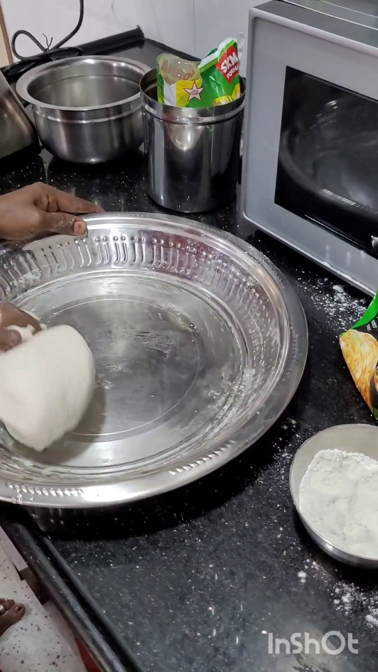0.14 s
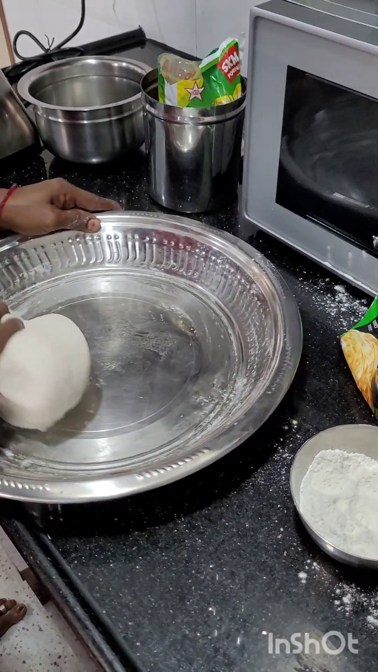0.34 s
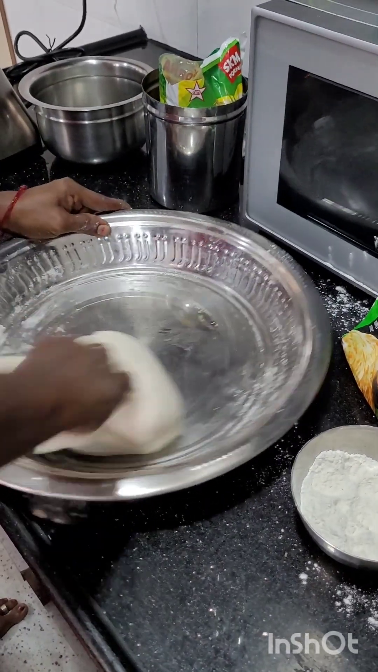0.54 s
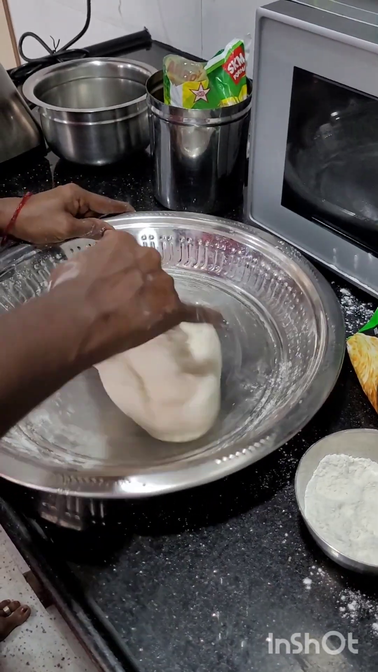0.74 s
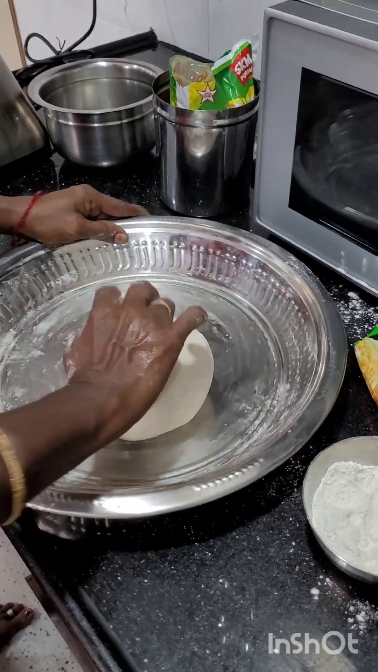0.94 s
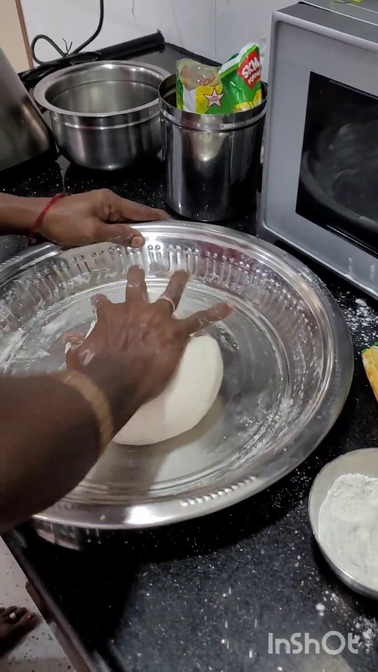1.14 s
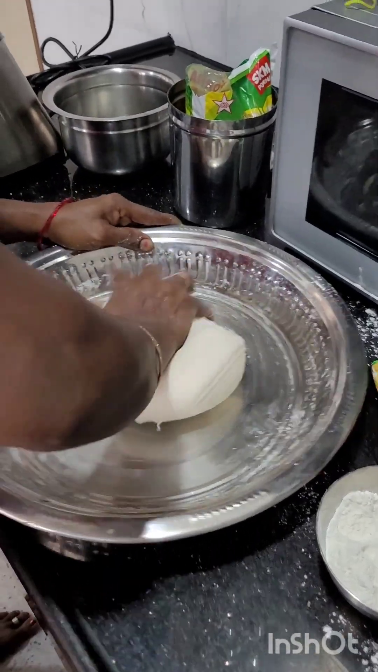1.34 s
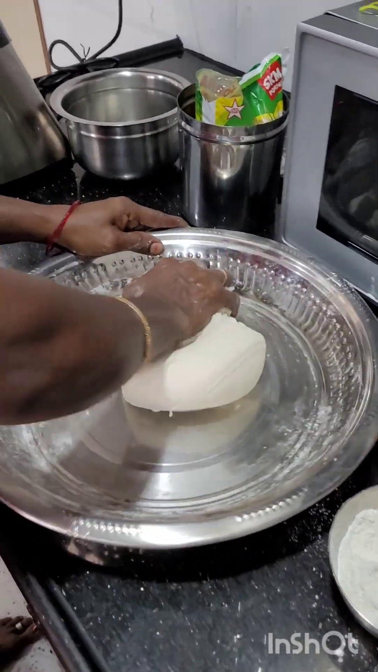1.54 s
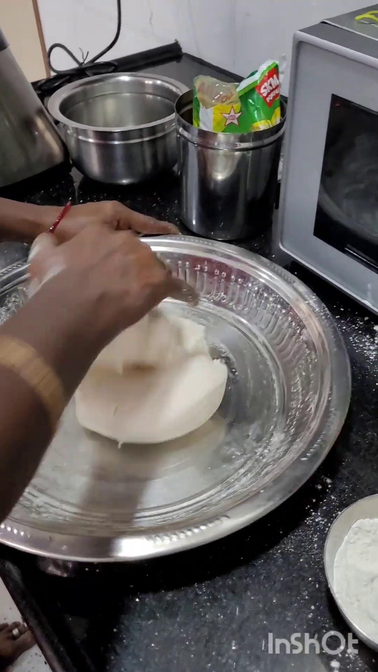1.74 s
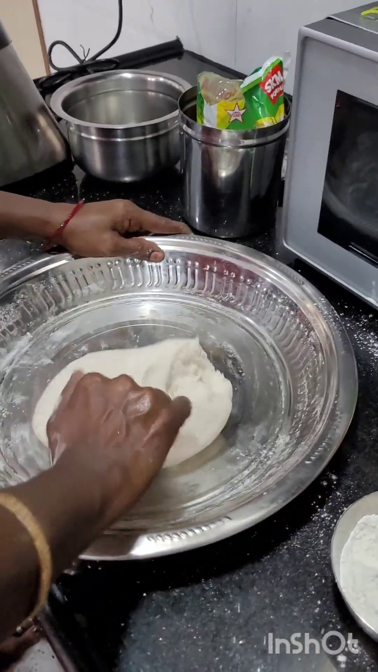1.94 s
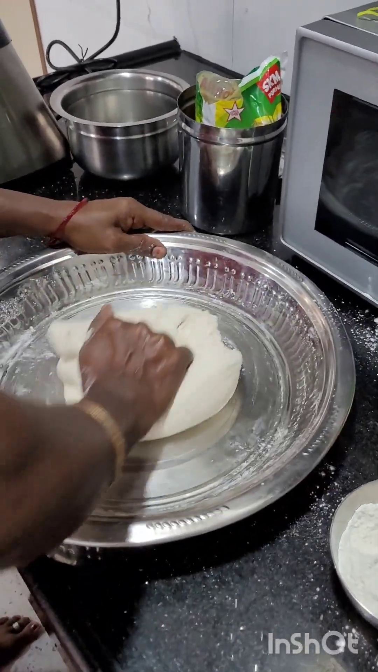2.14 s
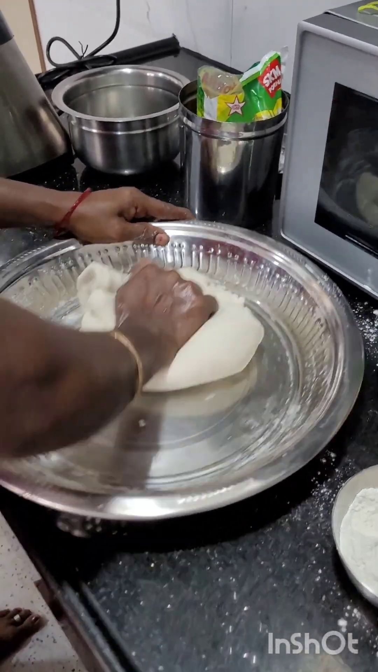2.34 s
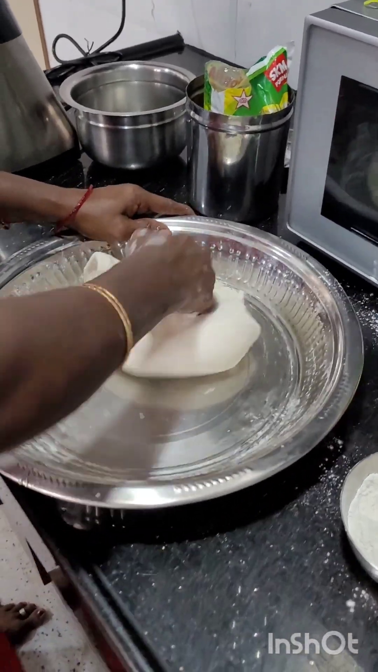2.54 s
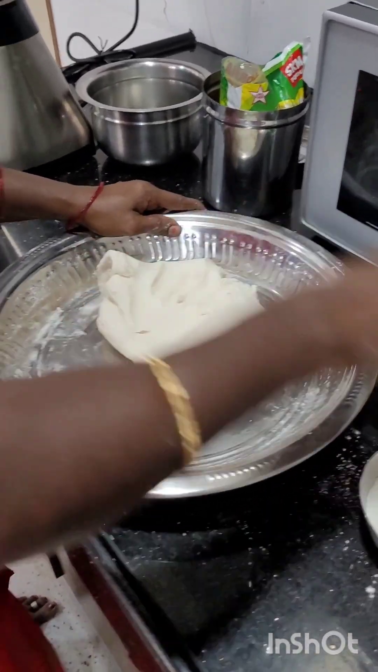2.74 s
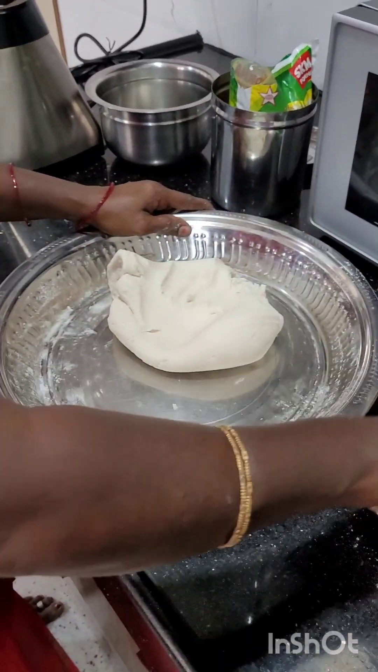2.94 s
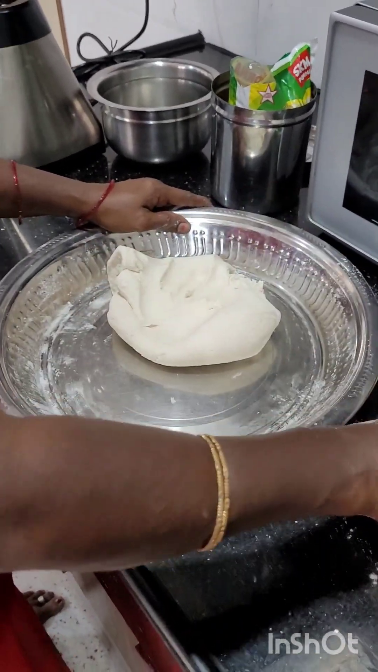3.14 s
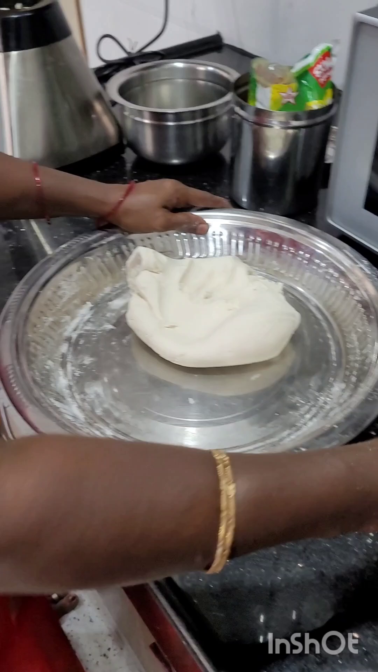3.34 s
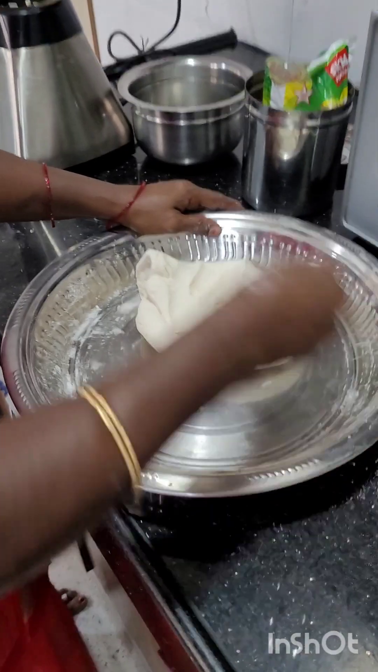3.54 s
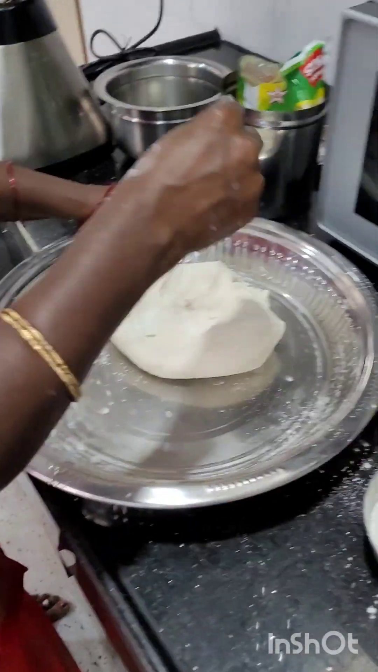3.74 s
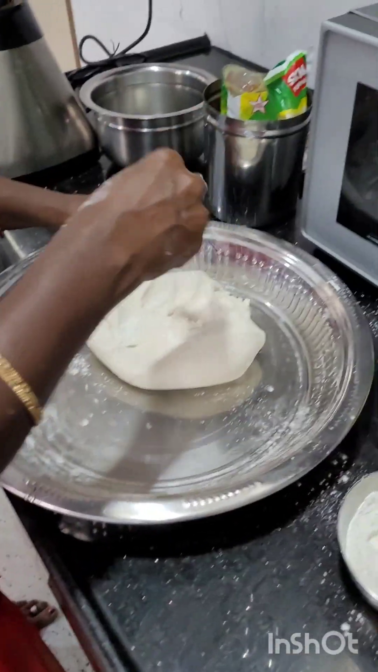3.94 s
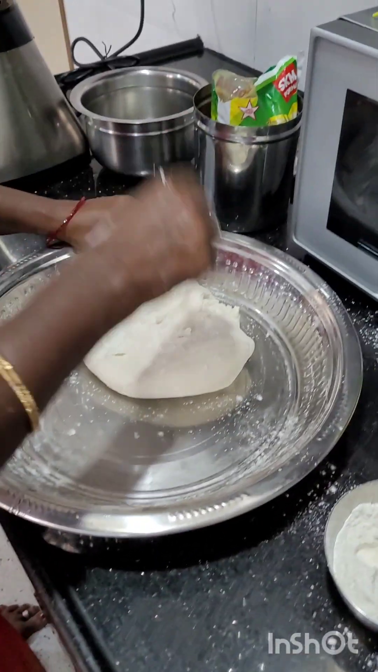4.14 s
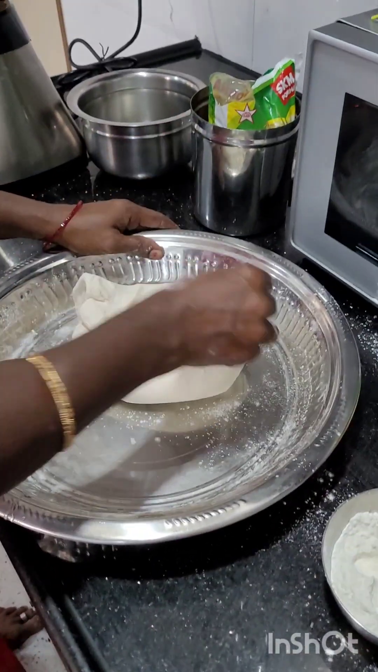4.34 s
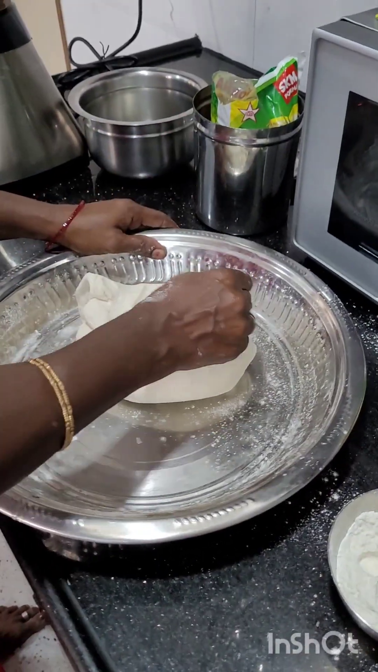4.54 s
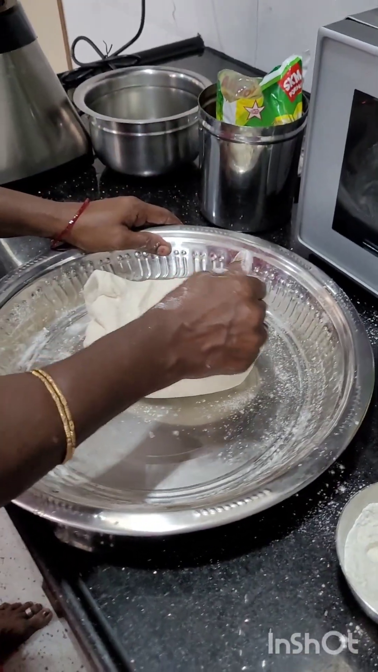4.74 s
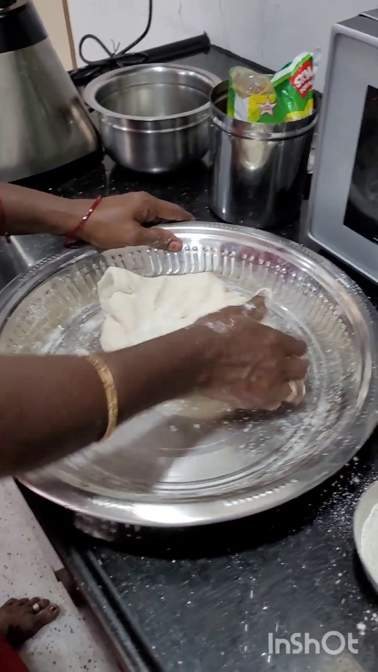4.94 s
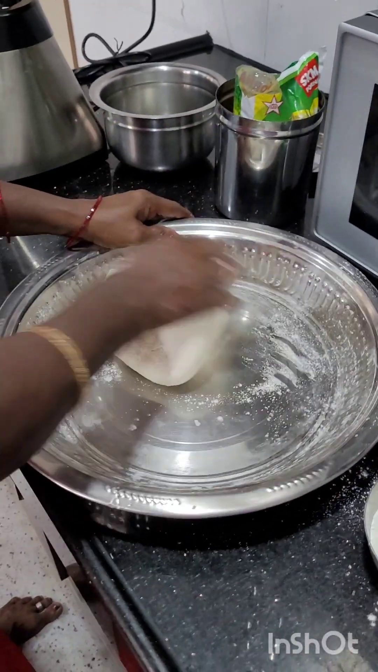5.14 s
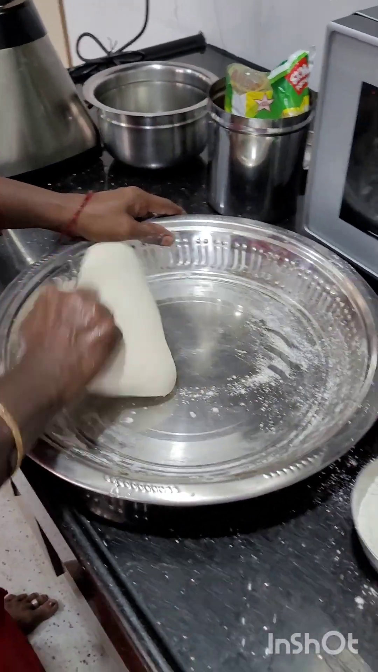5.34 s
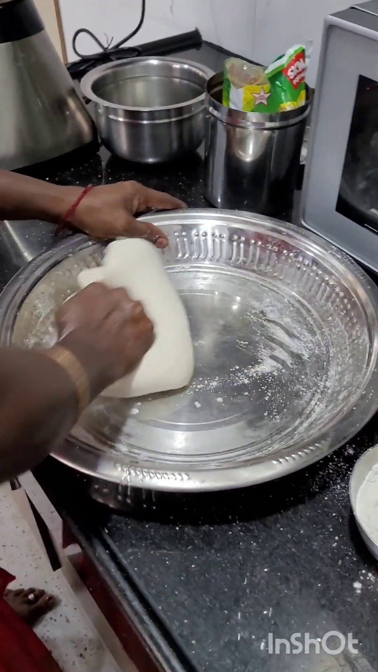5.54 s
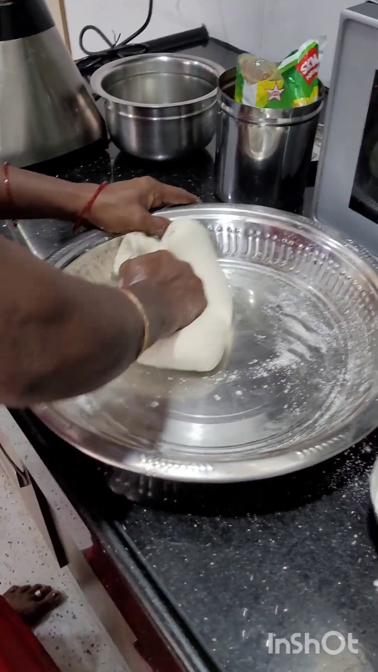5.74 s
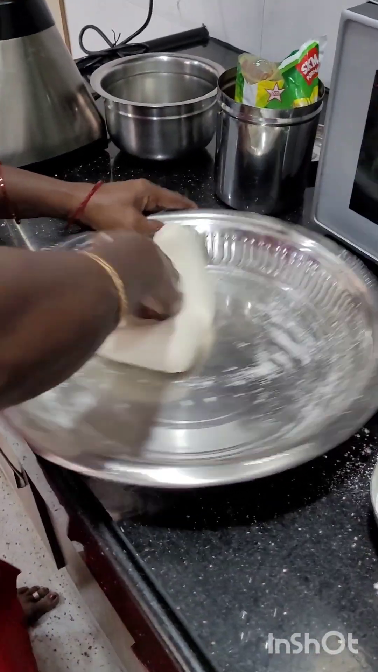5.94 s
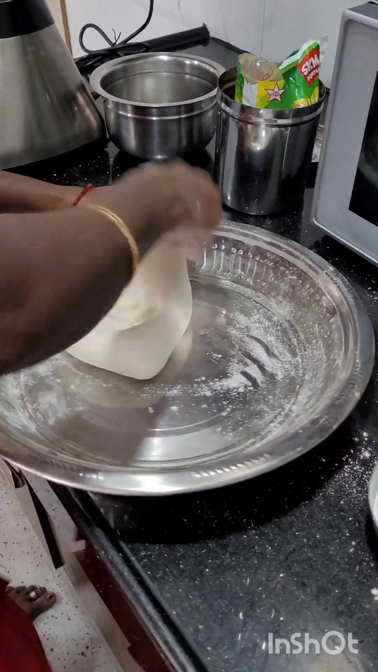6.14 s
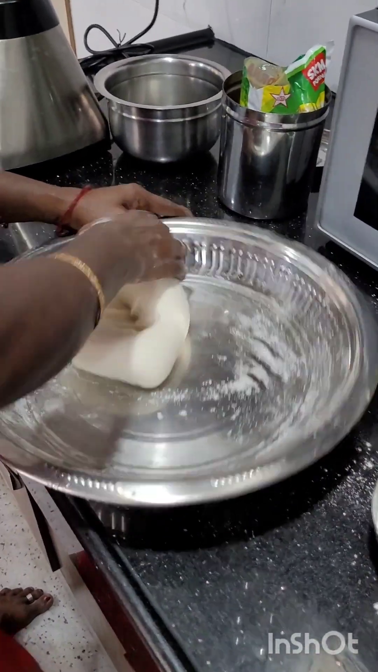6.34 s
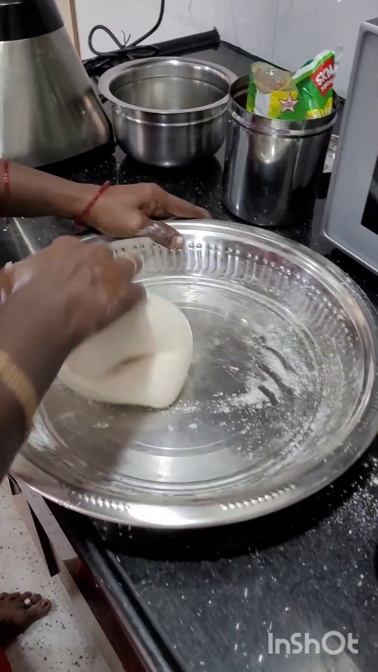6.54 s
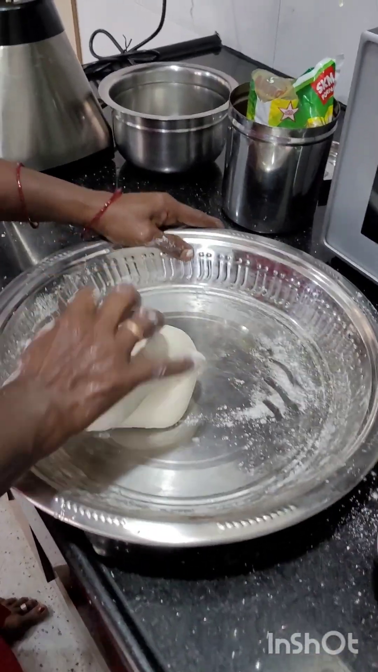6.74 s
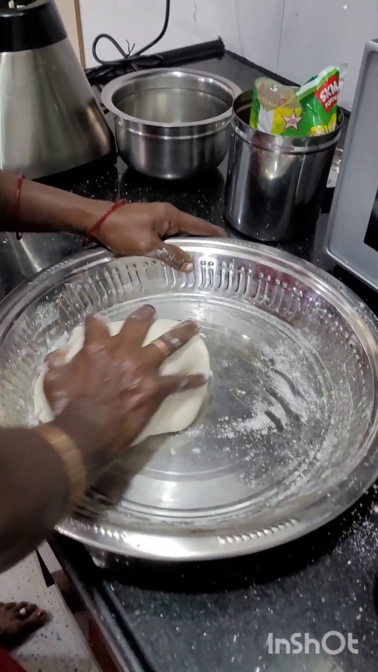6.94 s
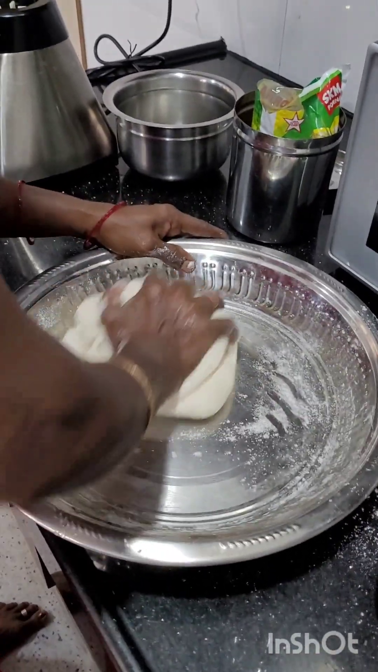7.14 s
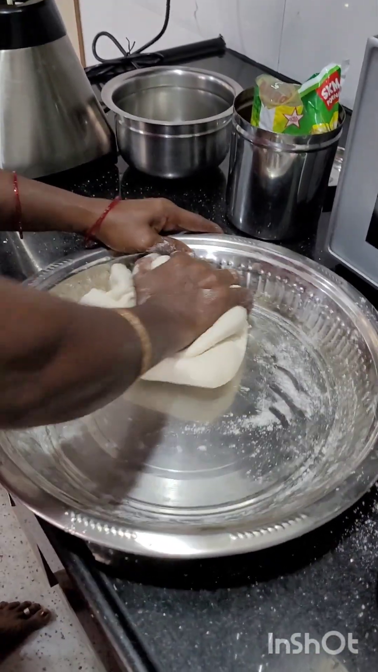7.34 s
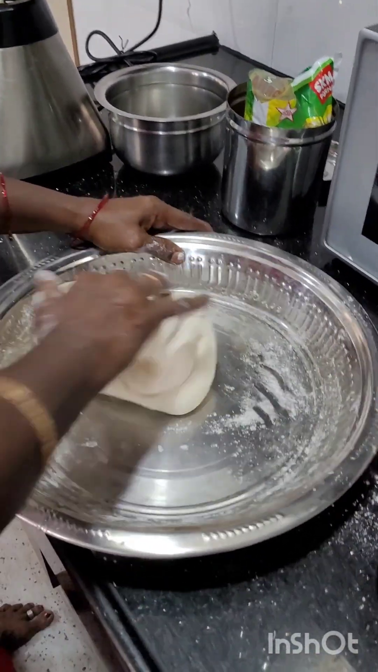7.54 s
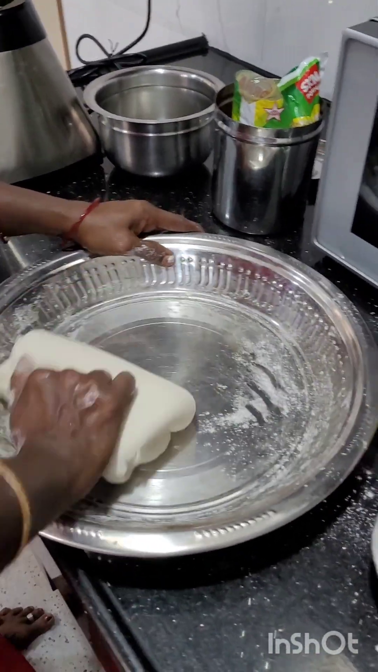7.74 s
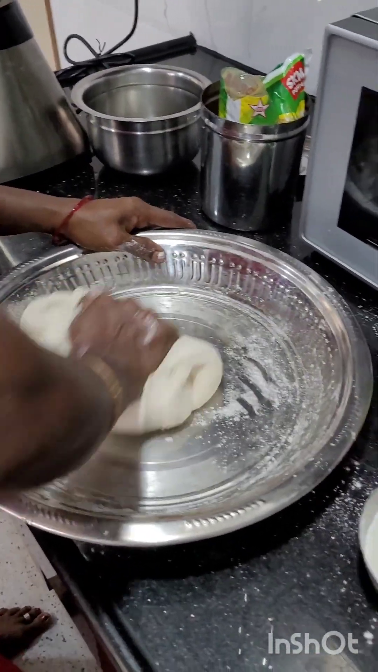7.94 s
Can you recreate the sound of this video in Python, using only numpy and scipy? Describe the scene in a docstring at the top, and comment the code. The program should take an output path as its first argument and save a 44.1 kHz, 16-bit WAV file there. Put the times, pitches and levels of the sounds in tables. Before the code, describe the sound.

Quiet kneading rustles, thumps and sticky crackles close up in a tiled kitchen, broken by one loud metallic clang and a weaker one.

```python
"""Soft dough is kneaded by hand on a wide steel plate on a stone kitchen counter, close to a phone.
Filtered noise with uneven slips makes the drag, the flour rustle and the grinding; short noise bursts
make the sticky snaps. Dull thuds are damped plate modes and a flexing floor; pats ring as short sines.
Twice the plate tips and clangs back on the counter: its modes ring long, the rim rattles,
and the tiled room answers with a decaying noise tail, over low room noise and appliance hum."""
import sys
import numpy as np
from scipy import signal
from scipy.fft import rfft, irfft, next_fast_len
from scipy.io import wavfile
from scipy.ndimage import uniform_filter1d, map_coordinates

SR = 44100
rng = np.random.default_rng(int(sys.argv[2]) if len(sys.argv) > 2 else 0)


def int16_out(signal):
    """Quantize to a 16-bit WAV file."""
    q = np.round(np.clip(np.atleast_2d(signal).T, -1, 1) * 32767)
    wavfile.write(sys.argv[1], SR, q.astype(np.int16))


N = 352800
TIME = np.arange(N) / SR  # seconds into the scene
AGE = np.arange(round(1.2 * SR)) / SR  # seconds since a blow

# Hand pushing dough over steel. Each row: start, rise and hold in seconds,
# relative drag level and skin hiss level in dB.
PUSHES = [(0.0, 0.0035, 0.089, -55.5, -62), (.175, 0.086, 0.16, -60.5, -58), (.3, .15, 0.17, -49.5, -53),
          (.928, 0.0057, 0.022, -51.5, -60), (1.0, 0.11, 0.068, -59.5, -61.5),
          (1.33, 0.05, 0.075, -59.5, -60.5), (1.44, 0.032, .02, -57.5, -64),
          (1.595, 0.024, 0.065, -51.5, -56.5), (1.76, 0.078, 0.2, -63.5, -64.5),
          (2.2, .12, .01, -62.5, -61), (2.44, 0.061, .11, -53, -59.5), (4.952, .015, 0.054, -52.5, -53.5),
          (5.03, 0.063, 0.11, -56.5, -72.5), (5.2, .05, .05, -68.5, -71), (5.4, 0.07, .02, -55, -60),
          (7.21, 0.016, .22, -59.5, -57.5), (7.465, 0.0068, .015, -43.5, -63),
          (7.725, .02, 0.026, -45.5, -55.5)]
# Fingers rubbing flour over the dough or peeling off it. Each row: start, rise and hold in seconds,
# relative rustle level and high fizz level in dB.
RUBS = [(.725, 0.021, .04, -67, -69), (.82, .1, 0.014, -69, -76), (3.68, 0.073, 0.056, -52.5, -55),
        (3.89, 0.069, .1, -63, -68), (4.365, .03, .05, -53.5, -58), (4.46, 0.12, 0.029, -53, -67),
        (4.83, 0.027, 0.027, -77, -81), (6.22, 0.025, .02, -57, -63.5), (6.36, 0.13, .02, -56, -63.5),
        (6.53, 0.096, 0.14, -56, -58.5), (6.9, 0.017, .04, -66, -66.5), (7.04, 0.081, .02, -54.5, -51.5),
        (7.8, 0.082, 0.21, -56.5, -70)]
# Fingers scooping in the flour bowl. Each row: start, rise and hold in seconds,
# dull crunch level and relative scrape level in dB.
SCOOPS = [(3.163, 0.028, 0.13, -42, -46), (3.37, 0.059, 0.031, -47.5, -44.5)]
# Hard shoves grinding the plate's foot on the counter. Each row: start, rise and hold in seconds, level in dB.
SHOVES = [(5.51, 0.019, 0.19, -42), (5.62, 0.076, 0.05, -42.5), (5.89, 0.046, 0.16, -47.5)]
# Fast sweeps of dough over dry steel. Each row: start, rise and hold in seconds, level in dB.
SWEEPS = [(.37, 0.067, .1, -44), (1.675, 0.02, .01, -49), (7.465, 0.011, 0.046, -48.5),
          (7.73, .03, .05, -56)]
RUB_DRAG_DB = -18  # relative to the rustle: a rub barely moves the dough
SHOVE_DRAG_DB, SHOVE_HISS_DB = 1, -5  # relative to the grinding
SCOOP_HISS_DB = -5  # relative to the scrape
SAG_DB_PER_S = 18  # a stroke weakens while it is held
RELEASE_DB_PER_S = 102.5  # and dies away when the hand stops

# Colours of dough on steel, skin, fingers on flour, high flour fizz, plate on stone and the flour bowl.
# Each row: frequency in Hz, relative density in dB per Hz.
SLIDE_COLOUR = [(60, -11), (150, -1), (280, 8.5), (600, -5), (900, 3), (1350, 3.5), (1900, -3),
                (2500, -7.5), (3400, -4), (6000, -13), (15000, -22)]
SKIN_COLOUR = [(800, -4), (2700, -12), (3600, -5.5), (4800, -1.5), (6300, -3.5), (8500, -3.5),
               (12000, -2.5), (15800, -9)]
FINGER_COLOUR = [(800, -4.5), (2700, -12), (3600, -3.5), (4800, -1), (6300, -2.5), (8500, 0), (12000, -4),
                 (15800, -11)]
FIZZ_COLOUR = [(5000, -23.5), (8000, -10), (10500, 0), (13000, -1), (16000, -5.5)]
STONE_COLOUR = [(60, -20.5), (190, -3.5), (240, 9.5), (290, -12), (420, -3.5), (620, -4.5), (1000, -11),
                (2000, -13.5), (8000, -25.5)]
FLOUR_COLOUR = [(50, -12), (130, -10), (230, 3.5), (500, 0), (1000, -8), (2000, -9), (6000, -23.5)]
SWISH_COLOUR = [(1200, -38), (2150, -8), (2500, -0.5), (3200, -8.0), (5500, -10.0), (9000, -13.0)]
# Bands in which the rubbed plate sings. Each row: centre in Hz, width in Hz,
# level in dB before a common lift.
SINGING_BANDS = [(607, 48, 8.5), (640, 50, 6.5), (1340, 190, -4.5), (2445, 200, 5), (3140, 170, -9)]

# Low room noise. Each row: frequency in Hz, relative density in dB per Hz.
AIR_COLOUR = [(15, -60), (25, -27), (74, -11), (92, -14), (127, -17), (166, -16.5), (212, -5.5), (326, -14),
              (394, -8.5), (545, -19.5), (714, -24), (962, -30), (4610, -56), (9070, -40), (16000, -52)]
# Appliance hum. Each row: frequency in Hz, rms level in dB.
HUM = [(100, -69.5), (226, -75), (393, -77)]

# Soft low thuds: dough and hand on the plate, the flour bowl touched at 3.171, a rolling rumble at 7.85.
# Each row: start in seconds, relative ring level in dB, low-pass corner in Hz,
# relative deep flex level and upper flex level in dB.
SOFT_THUDS = [(.239, -50, 800, -68, -50), (.934, -45, 1190, -42.5, -49), (1.686, -46, 1500, -64, -54.5),
              (2.591, -49, 590, -53, -51.5), (3.171, -67, 1000, -46, -56), (4.966, -46.5, 1015, -62, -46.5),
              (5.105, -47, 2500, -64, -60.5), (5.775, -52, 1200, -67.5, -64.5),
              (5.932, -41, 402, -58.5, -46.5), (5.983, -46, 1003, -68.5, -59.5),
              (7.477, -48.5, 1470, -62, -44), (7.742, -50.5, 885, -36.5, -42), (7.85, -61, 600, -48, -50)]
# The tipped plate falling back on the counter. Each row: start in seconds, relative ring level in dB,
# low-pass corner in Hz, hand damping as t60 in seconds, relative deep and upper flex levels in dB.
CLANGS = [(6.0198, -14, 3570, 9.1, -44, -51.5), (6.372, -23, 2950, 2.4, -44, -47.5)]
# Rim chatter on the stone, too brief to ring. Each row: start in seconds, relative level in dB,
# low-pass corner in Hz.
RATTLES = [(6.025, -7.5, 4000), (6.0364, -16.5, 1700), (6.045, -11, 997), (6.096, -28, 900),
           (6.3724, -14, 2196), (6.425, -28, 2010)]
# Clear modes of the plate. Each row: frequency in Hz, mean relative level in dB,
# t60 in seconds before further damping, left minus right in dB.
STEEL_MODES = [(183, -23.0, 0.78, -2.0), (258, -8.0, 0.71, -1.0), (329, -15.0, 0.61, -4.0),
               (448, -8, 0.65, -4.0), (504, -13.0, 0.71, -4.0), (565, -17.0, 0.65, -6.0),
               (614, -19.0, 0.8, -7.0), (680, -13, 0.85, -4.0), (704, 0.0, 0.82, -3.0),
               (746, -9.0, 0.85, 0.0), (872, -12.0, 0.85, -2.0), (955, -11.0, 0.85, -2.0),
               (1005, -10.0, 0.65, -2.0), (1068, -16.0, 0.79, -1.0), (1114, -16.0, 0.71, -3.0),
               (1275, -17.0, 0.8, -3.0), (1356, -9.5, 0.58, -3.0), (1425, -13.0, 0.68, -3.0),
               (1545, -17.0, 0.74, 3.0), (1611, -13.0, 0.55, -7.0), (1803, -20.0, 0.77, -7.0),
               (1949, -22.0, 0.67, -8.0), (2105, -24.0, 0.55, -2.0), (2315, -23.5, 0.58, -1.0),
               (2410, -20.0, 0.63, 3.0), (2498, -21.0, 0.85, -3.0), (2558, -18.0, 0.59, 1.0),
               (2686, -30.0, 0.73, 1.0), (3600, -32.0, 0.68, -2.0)]
# Colour of struck steel. Each row: frequency in Hz, relative density in dB per Hz.
CLANG_COLOUR = [(40, -43.5), (120, -12.5), (220, -9.5), (330, -1), (550, -7.5), (800, -0.5), (1400, -2.5),
                (1900, -11), (2550, -9), (3050, -19), (3650, -20.5), (4300, -20), (5400, -22), (7000, -26),
                (15000, -25.5)]
# Decay of the dense modes. Each row: frequency in Hz, t60 in seconds.
CLOUD_DECAY = [(100, 0.94), (300, 1), (900, 0.72), (2500, 0.46), (4500, 0.8), (12000, 0.17)]
MUFFLED_T60_S = 0.15  # extra damping in a soft thud: dough damps the steel that it lands on

# Deep and upper flex of the plate's floor. Each row: frequency in Hz, t60 in seconds in a soft thud,
# onset time constant in seconds.
FLOOR_FLEX = [(57, .32, 0.02), (103.7, .65, 0.0049)]
FREE_FLEX = 2.2  # how many times longer the floor swings after a clang
# Uneven low slump in each thud. Each row: frequency in Hz, relative density in dB per Hz.
SLUMP_COLOUR = [(25, -23.5), (55, -5.5), (115, 0.0), (170, -10.5), (240, -3.5), (330, -19.5), (700, -41.5)]

# The loudest sticky snaps. Each row: start in seconds, relative level in dB, centre in Hz,
# left minus right in dB on top of the microphone balance.
SNAPS = [(0.9347, -35, 9000, 0), (1.6858, -28.5, 11570, -8), (1.6899, -26, 3880, 5.5),
         (1.8781, -43.5, 12500, -1), (1.9845, -42.5, 11900, -4), (3.222, -33.5, 7000, -2),
         (3.2702, -22, 5680, -1.5), (3.2774, -27.5, 6800, -6), (3.3274, -34.5, 5500, -3.5),
         (3.418, -27.5, 12500, -8), (3.4386, -17.5, 11000, -0.5), (3.493, -29.5, 5500, -1),
         (3.5281, -30, 4700, -0.5), (3.9502, -47, 5400, -6), (4.0811, -51, 5950, -5),
         (4.317, -57, 3980, -5), (4.622, -34, 4540, -8), (4.6597, -38.5, 7400, 3.5),
         (4.8295, -40.5, 4420, -0.5), (5.5202, -25.5, 4830, 0), (5.531, -29, 8560, -8),
         (5.5626, -26.5, 4200, -9.5), (5.7461, -26.5, 4930, -4), (5.9182, -33, 5510, 5),
         (6.2403, -31, 4600, 3.5), (6.5763, -36, 5900, -8.5), (6.6196, -35, 7500, -0.5),
         (6.6327, -35.5, 5940, -5), (6.9024, -48, 11500, -7.5), (6.9125, -25, 12040, -6),
         (7.0812, -37.5, 10430, -9.5), (7.2212, -34, 7800, -5.5), (7.228, -38.5, 5170, -4),
         (7.3033, -43, 5500, -6), (7.3583, -32.5, 11550, -11.5), (7.636, -25, 10500, -8),
         (7.6488, -28, 5900, -6.5), (7.7952, -41.5, 4500, -3.5)]
# Short low pats and ticks: the sharp onset of some landings, finger taps, air pockets in the dough.
# Each row: start in seconds, relative level in dB, pitch in Hz.
PATS = [(.934, -41.5, 338), (.935, -36.5, 1040), (1.133, -45, 640), (1.616, -49, 1290),
        (1.639, -45.5, 1360), (2.591, -42, 264), (3.169, -39, 460), (3.27, -35.5, 820),
        (3.3275, -36.5, 720), (3.44, -35.5, 880), (3.529, -36.5, 884), (3.687, -44.5, 720),
        (3.716, -36, 980), (3.953, -47, 647), (4.211, -50, 610), (4.317, -44.5, 770), (4.622, -42.5, 492),
        (4.828, -49, 790), (4.966, -39, 271), (5.777, -32.5, 595), (6.924, -39, 790), (7.637, -36.5, 1520)]
# Snap colour below the crack. Each row: frequency in Hz, relative density in dB per Hz.
SNAP_BODY = [(300, -10), (1500, -15.5)]
# Crack of a snap, and scuff of a pat. Each row: multiple of its own frequency, relative density in dB per Hz.
SNAP_TOP = [(.55, -7), (1, 2), (1.5, -6), (3, -13)]
SCUFF = [(.25, -9), (.6, -4), (1, 2.5), (1.6, -6), (4, -22.5), (12, -42.5)]
SNAP_T60_S, CRACK_T60_S = 0.018, 0.0019
CRACK_DB = 3  # the instant of tearing, over the rest of the snap
PAT_CYCLES = 30.4  # a pat loses 60 dB in this many cycles
PAT_ATTACK_S = 0.00059
CLINK_S, CLINK_DB, CLINK_HZ, CLINK_T60_S = 1.69, -41, 3440, .12  # one light clink on the steel

# Decay of the tiled kitchen. Each row: frequency in Hz, t60 in seconds.
KITCHEN_DECAY = [(100, 0.73), (500, 0.86), (2500, 0.86), (6000, 0.46), (14000, 0.37)]
# Difference of the two microphones. Each row: frequency in Hz, left minus right in dB.
MIC_BALANCE = [(100, -2), (400, -2.5), (700, -4.5), (1300, -0.5), (2400, -1.5), (4400, -1), (8000, -4.5),
               (15000, 3)]
TOP_HZ = 16050  # the phone's band limit


def amp(db):
    """Decibels to gain."""
    return 10 ** (np.asarray(db) / 20)


def unit(x):
    """Scale to rms 1."""
    return x / np.sqrt(np.mean(x ** 2) + 1e-20)


def along(points, hz):
    """Read (Hz, value) points on a log axis."""
    f, v = np.transpose(points)
    return np.interp(np.log(hz + 1), np.log(f + 1), v)


def filtered(x, gain):
    """Apply a gain that is a function of frequency."""
    n = x.shape[-1]
    m = next_fast_len(n + 8192)
    return irfft(rfft(x, m) * gain(np.fft.rfftfreq(m, 1 / SR)), m)[..., :n]


def microphones(x, colour, side, left_db):
    """Colour two unrelated signals into left and right; long waves reach both microphones more alike."""
    def mid_and_side(hz):
        return amp(along(colour, hz)) * [np.ones_like(hz), side * np.clip(hz / 550, .3, 1)]

    def balance(hz):
        return amp(np.outer([.5, -.5], left_db + along(MIC_BALANCE, hz)))

    mid, apart = filtered(x, mid_and_side)
    return unit(filtered(np.array([mid + apart, mid - apart]), balance))


def noise(colour, side, left_db=0, size=N):
    """Coloured stereo noise of rms 1."""
    return microphones(rng.standard_normal((2, size)), colour, side, left_db)


def strokes(rows, column=0):
    """Gain per sample of strokes that swell, sag and die; column picks among the levels of a row."""
    power = np.zeros(N)
    for s, rise, hold, *levels_db in rows:
        swell = np.clip((TIME - s) / max(rise, 1 / SR), 0, 1)
        late = TIME - s - rise
        sag_db = SAG_DB_PER_S * np.clip(late, 0, hold)
        release_db = RELEASE_DB_PER_S * np.maximum(late - hold, 0)
        power += (swell * amp(levels_db[column] - sag_db - release_db)) ** 2
    return np.sqrt(power)


def wobble(rate):
    """A smooth random curve with rate knots a second."""
    knots = rng.standard_normal(N // 8)
    return map_coordinates(knots, [TIME * rate], mode="wrap")


def friction(colour, rate, grain_db, clump_db, side, left_db):
    """Tiny slips of uneven size: noise whose level wobbles at rate, and more slowly in clumps."""
    slips = amp(grain_db * wobble(rate) + clump_db * wobble(70))
    return microphones(slips * rng.standard_normal((2, N)), colour, side, left_db)


def singing(hz):
    """Gain of the rubbed plate: flat, with its bands standing out."""
    power = 1
    for centre, width, db in SINGING_BANDS:
        power = power + amp(db + 5) ** 2 / (1 + (2 * (hz - centre) / width) ** 2)
    return np.sqrt(power)


def patchy(x, depth_db):
    """The contact keeps shifting, so the colour flutters from moment to moment."""
    z = signal.stft(x, nperseg=512)[2]
    field = rng.standard_normal(z.shape[1:])
    field = uniform_filter1d(field, size=14, axis=0)  # smooth over frequency
    field = uniform_filter1d(field, size=8, axis=1)  # and over time
    return unit(signal.istft(z * amp(depth_db * unit(field)), nperseg=512)[1][:, :N])


def crackle():
    """Single flour grains and tiny sticky threads: about 400 random ticks a second, of uneven size."""
    chance, size = rng.random(N), rng.standard_normal((2, N))
    ticks = (chance < 400 / SR) * size * amp(3 * rng.standard_normal(N))
    return microphones(ticks, SKIN_COLOUR, side=0.93, left_db=-3.5)


def rubbing():
    """Dough drags over steel, skin hisses on flour, and the plate grinds on the stone."""
    rub, shove, scrape = strokes(RUBS), strokes(SHOVES), strokes(SCOOPS, column=1)
    # strokes that share a sound add as powers
    dragging = np.linalg.norm(
        [strokes(PUSHES), amp(RUB_DRAG_DB) * rub, amp(SHOVE_DRAG_DB) * shove, scrape], axis=0)
    hissing = np.linalg.norm(
        [strokes(PUSHES, column=1), amp(SHOVE_HISS_DB) * shove, amp(SCOOP_HISS_DB) * scrape], axis=0)

    slips = friction(SLIDE_COLOUR, rate=500, grain_db=0.0, clump_db=1.63, side=1.0, left_db=0)
    slips = unit(filtered(slips, singing))
    drag = dragging * amp(0.5) * patchy(slips, depth_db=1.5)
    swish = friction(SWISH_COLOUR, rate=800, grain_db=-1.5, clump_db=2.0, side=0.94, left_db=1.0)
    sweep = strokes(SWEEPS) * swish

    skin = friction(SKIN_COLOUR, rate=1500, grain_db=2.5, clump_db=0.5, side=1.0, left_db=0.5)
    hiss = hissing * amp(2.0) * patchy(skin, depth_db=2.5)
    fingers = friction(FINGER_COLOUR, rate=770, grain_db=-1.0, clump_db=2.5, side=1.0, left_db=-1.5)
    fizz = friction(FIZZ_COLOUR, rate=1100, grain_db=2.0, clump_db=4.1, side=0.99, left_db=-5.5)
    rustle = rub * amp(0.5) * patchy(fingers, depth_db=1.0) + strokes(RUBS, column=1) * fizz
    grains = np.hypot(hissing, rub) * amp(-5) * crackle()

    stone = friction(STONE_COLOUR, rate=290, grain_db=1.0, clump_db=0.5, side=0.71, left_db=-1.5)
    flour = friction(FLOUR_COLOUR, rate=250, grain_db=2.5, clump_db=-3, side=0.67, left_db=-1.5)
    grind = shove * stone
    scoop = strokes(SCOOPS) * flour
    return drag + sweep + hiss + rustle + grains + grind + scoop


def background():
    """Low room noise and the hum of an appliance, as steady noise and sines."""
    hum = np.zeros(N)
    for hz, db in HUM:
        hum += amp(db) * np.sqrt(2) * np.sin(2 * np.pi * (hz * TIME + rng.random()))
    return amp(-60.5) * noise(AIR_COLOUR, side=0.45, left_db=-2.5) + hum


def fade(t60):
    """A decay that loses 60 dB in t60 seconds."""
    return np.exp(-np.log(1000) * AGE / t60)


def dying(x, decays):
    """Let each frequency of x die at its own speed."""
    hz, t, z = signal.stft(x, SR, nperseg=256)
    z = z * np.exp(-np.log(1000) * t / along(decays, hz)[:, None])
    return signal.istft(z, SR, nperseg=256)[1][:, :x.shape[1]]


def contact(x, bright_hz):
    """A longer, softer contact weakens the high modes: a first-order low-pass."""
    return signal.lfilter(*signal.butter(1, min(bright_hz, SR / 3), fs=SR), x)


def add(track, s, sound):
    """Mix a sound into the track at s seconds."""
    part = track[:, round(s * SR):][:, :sound.shape[-1]]
    part += sound[..., :part.shape[1]]


def plate():
    """Each thud or clang rings the plate's clear modes and the dense cloud of modes between them."""
    out = np.zeros((2, N))
    short = SR // 5
    hz, mode_db, t60, left_db = np.transpose(STEEL_MODES)
    # a round plate's modes come in close pairs that beat
    split = rng.uniform(4, 9, (len(hz), 1))  # Hz
    beat = 1 + .42 * np.exp(2j * np.pi * (split * AGE + rng.random(split.shape)))
    decay = np.array([fade(t) for t in t60])
    onset = 1 - np.exp(-AGE / 0.0031)
    waves = decay * beat * np.exp(2j * np.pi * hz[:, None] * AGE) * onset
    # short waves reach the two microphones out of step
    skew = np.minimum(hz / 1000, .75) * rng.choice([-1, 1], len(hz))  # radians
    ports = amp(np.outer([.5, -.5], left_db)) * np.exp(1j * np.outer([1, -1], skew))

    muffled = [(s, db, bright_hz, MUFFLED_T60_S) for s, db, bright_hz, *_ in SOFT_THUDS]
    for s, db, bright_hz, damping, *_ in muffled + CLANGS:
        phase, size_db = rng.standard_normal((2, len(hz)))
        weights = ports * amp(mode_db + size_db) * np.exp(2j * np.pi * phase)
        modes = np.imag(weights @ waves) * fade(damping)
        cloud = noise(CLANG_COLOUR, side=.95, left_db=0.5, size=len(AGE))
        cloud = amp(-3) * dying(cloud, CLOUD_DECAY)
        strike = amp(7.5) * noise(CLANG_COLOUR, side=0.99, left_db=-3.5, size=short) * fade(0.02)[:short]
        add(out, s, amp(db) * contact(modes + cloud, bright_hz))
        add(out, s, amp(db) * contact(strike, bright_hz))
    for s, db, bright_hz in RATTLES:
        chatter = noise(CLANG_COLOUR, side=0.94, left_db=3.0, size=short) * fade(0.099)[:short]
        add(out, s, amp(db) * contact(chatter, bright_hz))
    return out


def thuds():
    """The floor of the plate swings briefly in two modes, with an uneven low slump of noise."""
    out = np.zeros((2, N))
    blows = [(row, 1) for row in SOFT_THUDS] + [(row, FREE_FLEX) for row in CLANGS]
    for (s, *_, deep_db, upper_db), longer in blows:
        for db, (hz, t60, attack) in zip((deep_db, upper_db), FLOOR_FLEX):
            swing = np.sin(2 * np.pi * hz * AGE) * amp([[-1], [1]])  # 2 dB stronger on the right
            slump = noise(SLUMP_COLOUR, side=0.6, size=len(AGE))
            envelope = fade(t60 * longer) * (1 - np.exp(-AGE / attack))
            add(out, s, amp(db) * (amp(2.0) * swing + amp(-0.5) * slump) * envelope)
    return out


def snaps():
    """Dough tears from skin and steel in bright noise cracks; pats and a clink ring as short sines."""
    out = np.zeros((2, N))
    size = SR // 3
    tear = amp(-2.5) * (fade(SNAP_T60_S) + amp(CRACK_DB) * fade(CRACK_T60_S))[:size]
    for s, db, hz, left_db in SNAPS:
        colour = SNAP_BODY + [(hz * k, gain_db) for k, gain_db in SNAP_TOP]
        add(out, s, amp(db) * noise(colour, side=1.0, left_db=left_db, size=size) * tear)

    pats = [(s, db, hz, PAT_CYCLES / hz) for s, db, hz in PATS]
    clink = (CLINK_S, CLINK_DB, CLINK_HZ, CLINK_T60_S)
    for s, db, hz, t60 in pats + [clink]:
        colour = [(hz * k, gain_db) for k, gain_db in SCUFF]
        scuff = noise(colour, side=0.82, left_db=-4.0, size=size)
        ring = np.sin(2 * np.pi * hz * AGE[:size])
        envelope = fade(t60) * (1 - np.exp(-AGE / PAT_ATTACK_S))
        add(out, s, amp(db) * (scuff + amp(-3) * ring) * envelope[:size])
    return out


def kitchen(x):
    """The diffuse answer of the tiled walls: convolution with noise that dies at each frequency's speed."""
    tail = dying(rng.standard_normal((2, len(AGE))), KITCHEN_DECAY) * (1 - np.exp(-AGE / 0.0048))
    return signal.fftconvolve(x, tail / np.linalg.norm(tail[0]), axes=1)[:, :N]


def scene():
    """Everything on the counter, with the room answering the steel, the snaps and the pats."""
    steel, cracks = plate(), snaps()
    room = kitchen(amp(-12.5) * steel + amp(-10.0) * cracks)
    return steel + cracks + thuds() + rubbing() + room + background()


def record(dry):
    """The phone drops the deepest bass, clips at full scale and keeps nothing above its band limit."""
    lean = signal.sosfilt(signal.butter(4, 45, "highpass", fs=SR, output="sos"), dry)
    return filtered(np.clip(lean, -1, 1), lambda hz: hz < TOP_HZ)


dry = scene()
out = record(dry)
int16_out(out)
```